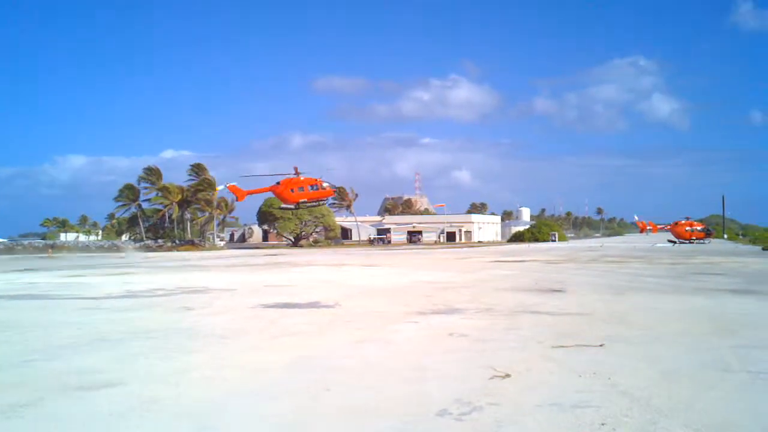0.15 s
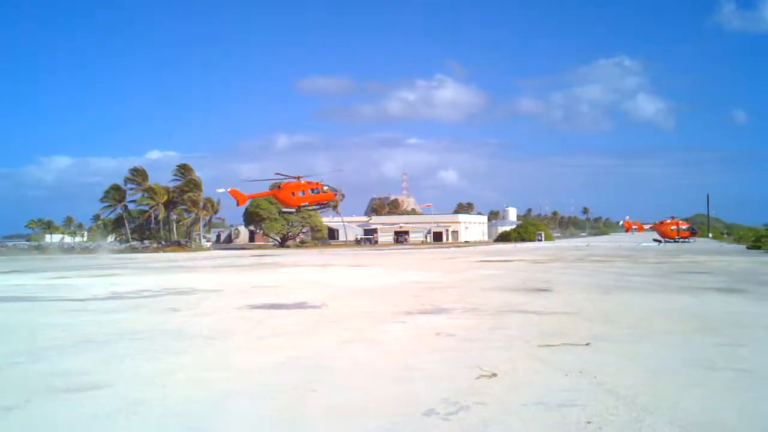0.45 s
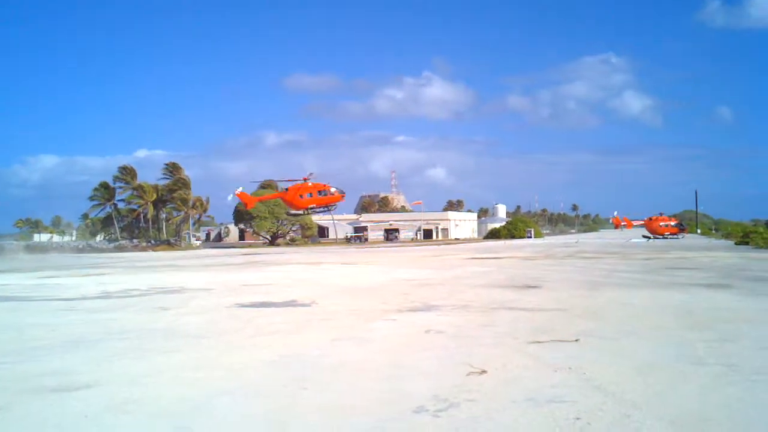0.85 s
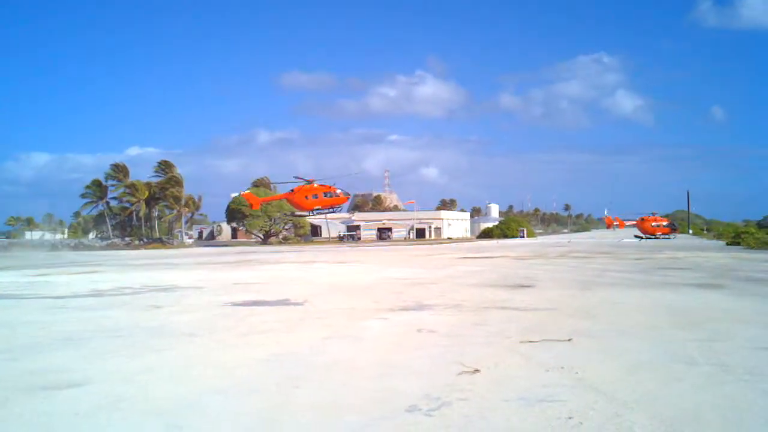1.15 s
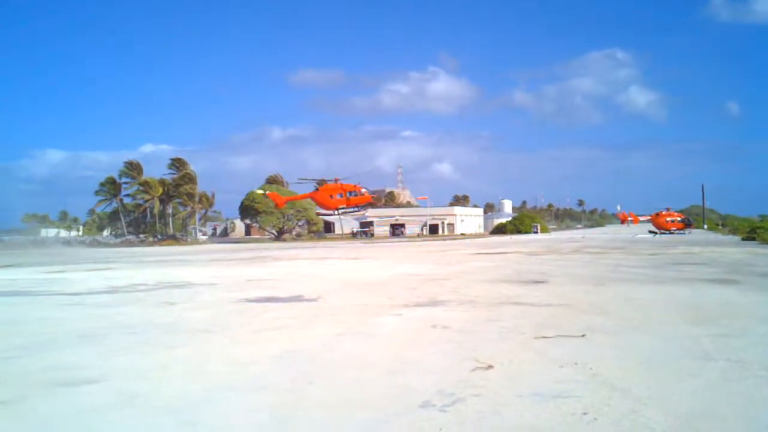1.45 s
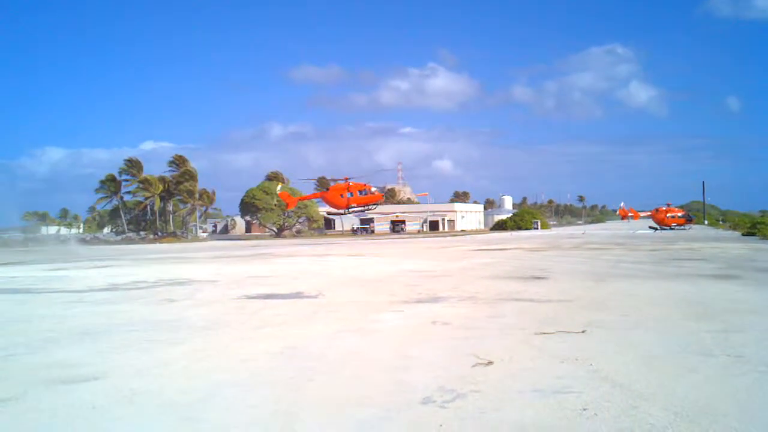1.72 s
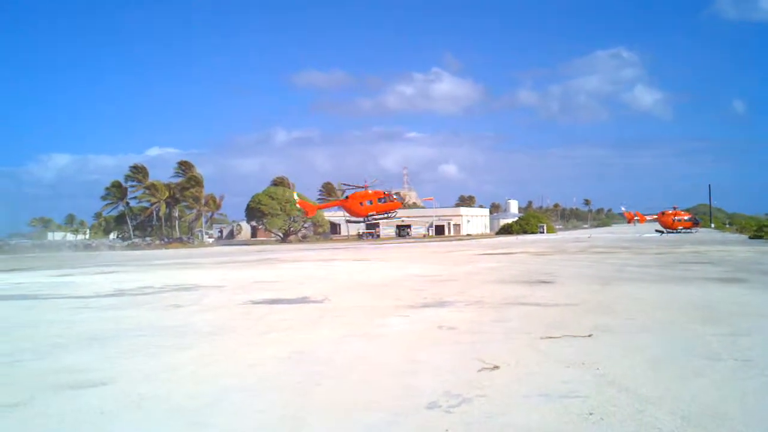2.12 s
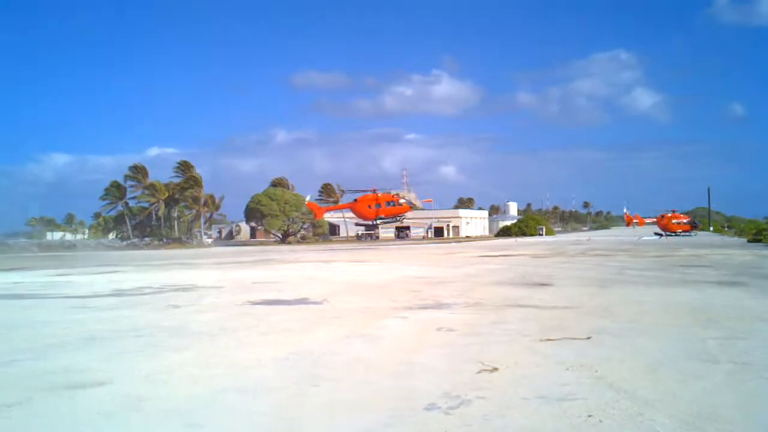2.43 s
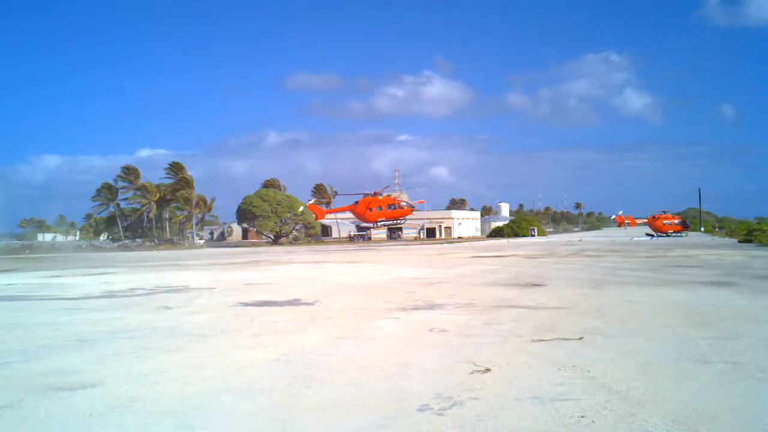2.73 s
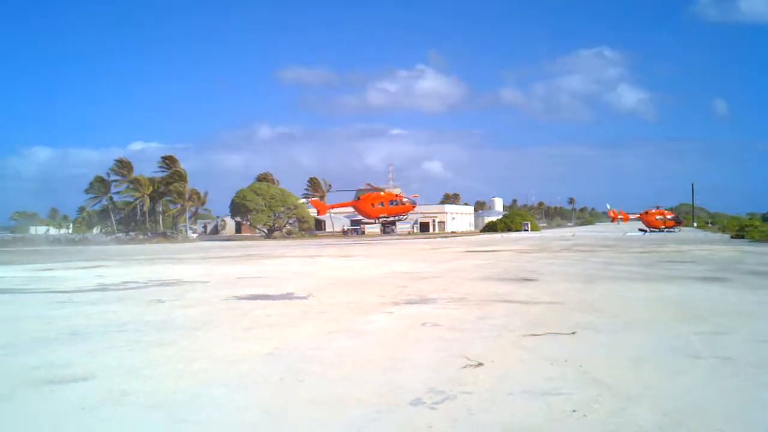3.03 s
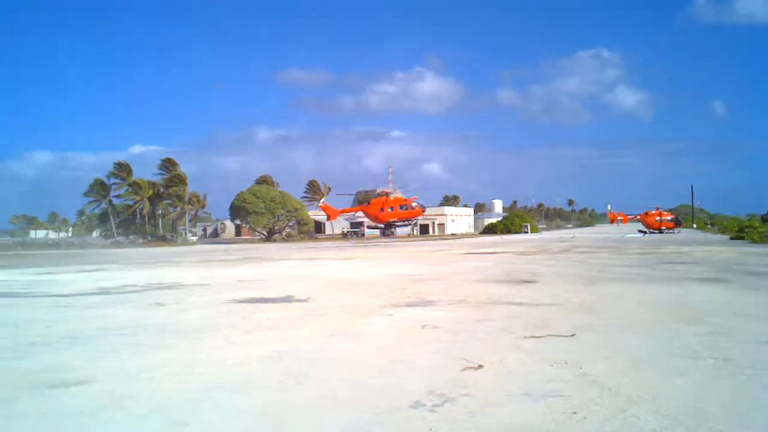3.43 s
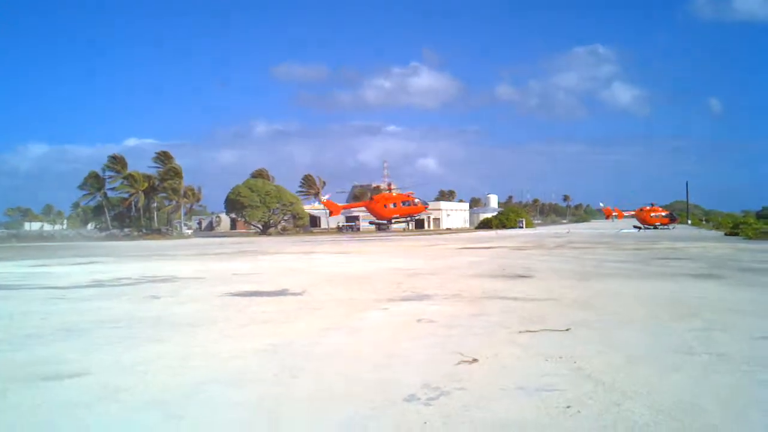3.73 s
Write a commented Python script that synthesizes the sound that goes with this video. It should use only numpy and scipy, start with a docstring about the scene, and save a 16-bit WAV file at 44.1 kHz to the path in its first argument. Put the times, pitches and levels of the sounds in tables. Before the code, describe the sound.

Continuous helicopter drone with rapid blade flutter and thin turbine whine, heard outdoors from some distance; uneven wind buffets strike the close-spaced stereo microphone throughout, while blown sand hisses in brief swells.

```python
"""On a sandy airfield, a helicopter hovers some way off. Gusts buffet the microphone and blow hissing sand.
The tail rotor hums as a set of sine tones, the main blades swish as pulsing noise, the turbines whine.
Wind, buffets and sand are shaped noises that differ at the two closely spaced ports of the microphone.
The recorder widens the stereo image by subtracting from each port the other one, slightly delayed."""
import sys
import numpy as np
from scipy import signal
from scipy.fft import rfft, irfft
from scipy.io import wavfile
from scipy.ndimage import uniform_filter1d

SR = 44100
rng = np.random.default_rng(int(sys.argv[2]) if len(sys.argv) > 2 else 0)


def int16_out(signal):
    """Quantize to a 16-bit WAV file."""
    q = np.round(np.clip(np.atleast_2d(signal).T, -1, 1) * 32767)
    wavfile.write(sys.argv[1], SR, q.astype(np.int16))


N = 170667
TIME = np.arange(N) / SR   # seconds
BINS = np.maximum(np.fft.rfftfreq(N, 1 / SR), 1)   # Hz, kept above zero for the logarithm

# Wind strength at the microphone. Each row: time in seconds, level in dB.
GUST_LEVEL = [(0.0, 1), (0.14, 9), (0.18, -5.5), (0.34, 5), (0.42, 1), (0.5, 6.5), (0.59, -1), (0.67, 2),
              (0.73, 1), (0.77, 9.5), (0.89, -2.5), (1.0, 7.5), (1.17, -6.5), (1.28, 0.5), (1.31, -3),
              (1.37, -0.5), (1.5, -1), (1.72, 1), (1.75, 9), (1.81, -4), (1.88, 4.5), (2.1, 5.5), (2.27, 3),
              (2.32, -0.5), (2.35, 3), (2.41, 3.5), (2.49, 1), (2.58, 0.5), (2.71, 2), (2.83, -2.5),
              (2.89, 1.5), (2.96, -3.5), (3.07, 5), (3.13, -1), (3.17, 4), (3.32, 5.5), (3.43, 5.5),
              (3.51, -3), (3.62, -2), (3.72, 3.5), (3.79, -13), (3.86, 4)]
# Wind rumble in each port when the gust level is 0 dB. Each row: frequency in Hz, density in dB per Hz.
WIND_SPECTRUM = [(25, -67), (45, -74), (65, -61), (100, -53), (150, -49.5), (230, -52), (350, -53.5),
                 (500, -61.5), (750, -66), (1200, -75.5), (1900, -77), (2700, -78), (4000, -101.5),
                 (7000, -105)]
GUST_TOP_SHARE = 0.5   # the highest band follows the gusts by half, the lowest fully
WIND_BILLOW_DB, WIND_BILLOW_HZ = 1.5, 2.9   # slow billowing, strongest in the lowest band
EDDY_HZ = 60.4   # rate of the quick eddies
# Change in dB per unit of eddy strength, in the lowest and the highest band.
EDDY_BASS_DB, EDDY_TREBLE_DB = 0.9, 2.5
SHARED_EDDY, OWN_EDDY = 1.66, 0.71   # eddy strength common to both ports, and separate in each

# Eddies that hit the ports hard. Each row: start in seconds, body level in dB, length in seconds,
# thump level in dB relative to the body, crackle level in dB.
BUFFET_EVENTS = [(.004, -14.5, 0.0064, -3, -36), (0.02, -18, 0.012, 3, -40), (0.036, -11, 0.014, -2, -55),
                 (.077, -18.5, 0.022, -2, -54), (0.103, -14.5, 0.017, -2, -53),
                 (.131, -12, 0.016, 1.5, -54), (0.29, -18, 0.012, 5, -57), (.334, -13, 0.013, 1, -41),
                 (0.494, -21, 0.0073, 0, -55), (.522, -17, .015, 6, -49), (0.633, -15.5, 0.0072, 0, -51),
                 (0.668, -17, 0.012, 3, -57), (0.696, -17, 0.0085, -6, -44), (0.769, -20, 0.016, 4, -45),
                 (0.794, -18, 0.021, 2, -44), (0.972, -15, 0.013, 5.5, -38), (1.013, -13.5, 0.021, 4, -35),
                 (1.044, -9.5, 0.0055, 4, -32), (1.085, -25.5, 0.021, 13, -58),
                 (1.239, -15, 0.014, -9, -59), (1.269, -18, 0.016, 4, -51), (1.649, -12, 0.01, 4, -43),
                 (1.74, -17, 0.015, 7, -53), (1.866, -13, 0.0085, -1, -56), (1.908, -15.5, 0.012, -3, -45),
                 (2.082, -14.5, 0.014, -4, -48), (2.151, -15.5, 0.017, 1, -42),
                 (2.189, -16.5, 0.019, 7, -55), (2.227, -11, 0.0075, 7, -54), (2.258, -12, 0.0093, 10, -30),
                 (2.351, -24, 0.0047, 19, -55), (2.398, -21, 0.0067, -6, -35),
                 (2.478, -17, 0.014, 7.5, -45), (2.52, -25, 0.0083, 8, -50),
                 (2.614, -17.5, 0.032, -15, -40), (2.709, -16, 0.0074, -1, -55),
                 (3.031, -18.5, 0.0065, -4, -46), (3.09, -10.5, 0.0068, -1, -54),
                 (3.383, -25, 0.011, -6, -55), (3.431, -12, 0.012, 6, -60), (3.478, -14, 0.004, 5.5, -59),
                 (3.521, -19.5, 0.023, 5, -54), (3.561, -10, 0.012, -5, -41),
                 (3.579, -11.5, 0.0196, 3, -37.5), (3.64, -8, 0.01, -0.5, -40)]
# Colour of a buffet's body and thump at 0 dB. Each row: frequency in Hz, density in dB per Hz.
BUFFET_SPECTRUM = [(40, -49), (100, -31), (250, -31.5), (500, -34.5), (900, -43.5), (1400, -49),
                   (2000, -58.5), (3000, -84), (4500, -100)]
# Colour of a buffet's crackle at 0 dB. Each row: frequency in Hz, density in dB per Hz.
CRACKLE_SPECTRUM = [(800, -56), (2000, -28.5), (3400, -38), (4500, -52), (8000, -64)]
BUFFET_EDGE_S, BUFFET_FADE_DB, BUFFET_RAGGED_DB = 0.00088, 1.5, 2.5
THUMP_BELOW_HZ = 310   # the thump lies below this pitch, the body above
BODY_EVEN_S, THUMP_EVEN_S = 0.0045, 0.0124   # body and thump are steadied over these times

# Level of the blowing sand. Each row: time in seconds, level in dB.
SAND_LEVEL_CURVE = [(0.0, -47.5), (0.3, -49), (0.45, -45), (0.65, -49.5), (0.73, -39), (0.75, -36.5),
                    (0.81, -42), (0.97, -46), (1.02, -42.5), (1.13, -50), (1.48, -47), (1.69, -37.5),
                    (1.8, -42), (1.87, -39.5), (1.91, -46.5), (1.95, -38.5), (2.17, -45.5), (2.21, -41),
                    (2.34, -50.5), (2.48, -45), (2.55, -50), (2.63, -42.5), (2.84, -52), (2.92, -43),
                    (2.96, -46.5), (3.21, -43.5), (3.39, -50.5), (3.48, -46), (3.55, -52.5), (3.87, -46)]
# Sand hiss at 0 dB. Each row: frequency in Hz, density in dB per Hz.
SAND_SPECTRUM = [(2600, -55), (3050, -46), (4000, -43.5), (4450, -40), (5200, -34), (6400, -36.5),
                 (7500, -35), (8600, -36), (9300, -45.5), (10200, -38.5), (11300, -44), (12600, -51.5),
                 (14000, -51)]
SAND_FLUTTER_DB, SAND_FLUTTER_HZ = 3, 21.2   # random flutter of each band
SAND_GRAIN_DB, SAND_CHOP_DB = 1, 0.33   # fast graininess; swing with each main blade
SAND_SECOND_PORT_DB = 0.44   # the second port gets this much more sand

# Turbine whines. Each entry: pitch in Hz.
WHINE_PITCHES = [3230, 5694, 6284, 8614, 9785, 10380]
# How widely each whine is smeared. Each entry: width in Hz.
WHINE_WIDTHS = [63, 20, 83, 80, 120, 270]
# Level of each whine halfway through the scene. Each entry: level in dB.
WHINE_LEVELS = [-62.5, -65, -60.5, -67, -59, -54.5]
# Steady rise or fall of each whine. Each entry: rise in dB per second.
WHINE_RISES = [-1, 4, 3.5, -7, -1, -1.5]
WHINE_WANDER, WHINE_WAVER_DB = .003, 3.5   # wander as a fraction of the pitch; waver of the level

# Air torn by the main blades at 0 dB. Each row: frequency in Hz, density in dB per Hz.
ROAR_SPECTRUM = [(60, -88), (150, -56), (220, -60), (360, -58.5), (520, -67.5), (820, -65), (1200, -80.5),
                 (1550, -70.5), (2100, -91), (3200, -101.5), (4500, -100), (12000, -104)]
# Level of the roar. Each row: time in seconds, level in dB.
ROAR_LEVEL_CURVE = [(0, -4), (.8, 0.5), (1.3, -3.5), (2.0, 4), (2.6, -2.5), (3.4, 2.5), (3.87, -0.5)]
MAIN_BLADE_HZ, FIRST_BLADE_S = 25.79, 0.00042   # blades passing per second; first pass
SWISH_BASS_DB, SWISH_TREBLE_DB, SWISH_SPLIT_HZ = 2.5, 0.7, 1010   # swing below and above the split
SWISH_UNEVEN = 0.1   # slow random change of the swing, as a fraction
SLAP_DB, SLAP_S = 3.0, 0.0035   # extra edge as a main blade passes, and its decay
TAIL_CHOP_DB, FIRST_TAIL_BLADE_S = 2, 0.014   # flutter of the roar at the tail blade rate

# Pitches of the rotor tones. Each row: multiple of the tail blade rate, added multiple of the main blade rate.
ROTOR_TONE_ORDERS = [(2, 0), (3, 0), (3, 1), (4, 0), (4, 1), (5, 0), (5, 1), (6, 1), (9, 1), (10, 1)]
# Level of each rotor tone where its swell is 0 dB. Each entry: level in dB.
ROTOR_TONE_LEVELS = [-35.5, -30.5, -38, -38, -36, -62, -60, -53, -53, -54]
# Rise and fall of the rotor tones. Each row: time in seconds, harmonics in dB, side tones in dB.
ROTOR_TONE_SWELL = [(0, -15, -13), (.45, -16, -28), (.65, 0, -4), (1.05, -12, -11), (1.45, -2, -30),
                    (1.9, -3, 3), (2.25, 0.5, -4), (2.42, -8, -3), (2.62, 3, 0), (3.0, -1.5, 2),
                    (3.4, -7, 8), (3.65, 2, 2.5), (3.87, -22, -1.5)]
TAIL_BLADE_HZ = 72.8
TONE_WAVER_DB, SPEED_WANDER = 1.14, 0.00046   # wander as a fraction of the rotor speed

# How much of the opposite port is subtracted. Each row: frequency in Hz, share from 0 to 1.
CROSSFEED_SHARE = [(100, 1), (4100, 1), (4700, .4), (14000, .33)]
# Gain of the stereo difference. Each row: frequency in Hz, gain in dB.
WIDTH_GAIN = [(100, -1), (500, 0), (1000, 0.5), (2000, 6.5), (3200, -1), (6000, -1), (12000, 0.5)]
PORT_DELAY_S = .000385
DIP_DB, DIP_WIDTH_HZ = -29, 174   # narrow dip in the sum of the channels, near 2600 Hz
CUTOFF_HZ = 13850


def from_db(db):
    """Turn decibels into gain."""
    return 10 ** (np.asarray(db) / 20)


def in_time(rows):
    """Read a control curve at every sample, with straight lines between its points."""
    return np.interp(TIME, *np.transpose(rows))


def at_hz(points, hz):
    """Read a spectrum on a logarithmic frequency axis, since hearing works by ratios of pitch."""
    f, value = np.transpose(points)
    return np.interp(np.log(hz), np.log(f), value)


def drift(rate):
    """Make a smooth random curve of spread 1 with about this many changes a second."""
    # Computed at every 20th sample; the first 3000 values let the filter settle.
    r = np.exp(-40 * np.pi * rate / SR)
    steps = rng.standard_normal(N // 20 + 3002)
    slow = signal.lfilter([1], [1, -2 * r, r * r], steps)[3000:]
    return np.interp(np.arange(N) / 20, np.arange(len(slow)), slow / slow.std())


def noise_bins(spectrum, channels=2):
    """Give the frequency bins of unrelated noises with the given density."""
    white = rfft(rng.standard_normal((channels, N)))
    return white * from_db(at_hz(spectrum, BINS)) * np.sqrt(SR / 2)


def noise_bands(spectrum, count):
    """Split two-port noise into overlapping bands: (height from low 0 to high 1, band)."""
    centres = np.geomspace(spectrum[0][0], spectrum[-1][0], count)
    bins = noise_bins(spectrum)
    for k, share in enumerate(np.eye(count)):
        window = np.interp(np.log(BINS), np.log(centres), share)
        yield k / (count - 1), irfft(bins * window, N)


def evened(noise, hold_s):
    """Hold a noise near its mean power, so that each burst has its own strength."""
    power = uniform_filter1d(noise ** 2, max(int(hold_s * SR), 1))
    return noise * np.sqrt(power.mean() / (power + .05 * power.mean()))


def wind():
    """Lumpy rumble, different in each port: its bass billows slowly, quick eddies shake its upper bands most."""
    gust_db, eddies, out = in_time(GUST_LEVEL), drift(EDDY_HZ), 0
    for height, band in noise_bands(WIND_SPECTRUM, count=9):
        own_eddies = np.array([drift(EDDY_HZ), drift(EDDY_HZ)])
        strength = SHARED_EDDY * eddies + OWN_EDDY * own_eddies
        eddy_db = (EDDY_BASS_DB + (EDDY_TREBLE_DB - EDDY_BASS_DB) * height) * strength
        billow_db = WIND_BILLOW_DB * (1 - height) * drift(WIND_BILLOW_HZ)
        followed_db = gust_db * (1 + (GUST_TOP_SHARE - 1) * height)
        out = out + band * from_db(billow_db + followed_db + eddy_db)
    return out


def buffets():
    """Ragged bursts of turbulence: each hits suddenly, fades a little and breaks off; some thump, some crackle."""
    body_gain, thump_gain, crackle_gain = 0, 0, 0
    for start, db, length, thump_db, crackle_db in BUFFET_EVENTS:
        nearest_edge = np.minimum(TIME - start, start + length - TIME)
        gate = np.clip(nearest_edge / BUFFET_EDGE_S + .5, 0, 1)
        burst = gate * from_db(-BUFFET_FADE_DB * np.clip((TIME - start) / length, 0, 1))
        body_gain = body_gain + from_db(db) * burst
        thump_gain = thump_gain + from_db(db + thump_db) * burst
        crackle_gain = crackle_gain + from_db(crackle_db) * burst
    low = 1 / (1 + (BINS / THUMP_BELOW_HZ) ** 6)   # share of the power that belongs to the thump
    body = evened(irfft(noise_bins(BUFFET_SPECTRUM) * np.sqrt(1 - low), N), BODY_EVEN_S)
    thump = evened(irfft(noise_bins(BUFFET_SPECTRUM) * np.sqrt(low), N), THUMP_EVEN_S)
    crackle = irfft(noise_bins(CRACKLE_SPECTRUM), N)
    bursts = body * body_gain + thump * thump_gain + crackle * crackle_gain
    return bursts * from_db(BUFFET_RAGGED_DB * drift(310))


def sand():
    """Fine grainy hiss of blown sand, fluttering in the rotor wash, a little unequal at the two ports."""
    hiss = 0
    for _, band in noise_bands(SAND_SPECTRUM, count=14):
        hiss = hiss + band * from_db(SAND_FLUTTER_DB * drift(SAND_FLUTTER_HZ))
    wash_db = SAND_CHOP_DB * np.cos(2 * np.pi * MAIN_BLADE_HZ * (TIME - FIRST_BLADE_S))
    grain_db = SAND_GRAIN_DB * drift(740)
    level = from_db(in_time(SAND_LEVEL_CURVE) + wash_db + grain_db)
    return hiss * level * from_db([[0], [SAND_SECOND_PORT_DB]])


def turbines():
    """Narrow whines, smeared and swayed by the moving air, differently at each port."""
    out = 0
    for hz, width_hz, db, rise in zip(WHINE_PITCHES, WHINE_WIDTHS, WHINE_LEVELS, WHINE_RISES):
        phase = 2 * np.pi * np.cumsum(hz * (1 + WHINE_WANDER * drift(4))) / SR
        # Random strengths of the cosine and the sine spread the tone into a narrow band.
        smeared = np.array([drift(width_hz) * np.cos(phase) + drift(width_hz) * np.sin(phase)
                            for port in range(2)])
        level_db = db + rise * (TIME - TIME.mean()) + WHINE_WAVER_DB * drift(6.8)
        out = out + smeared * from_db(level_db)
    return out


def main_rotor():
    """A roar that swells and slaps with every main blade, mostly in its bass, and flutters with the tail blades."""
    blades = MAIN_BLADE_HZ * (TIME - FIRST_BLADE_S)
    swish = np.cos(2 * np.pi * blades) * (1 + SWISH_UNEVEN * drift(2.3))
    since_blade_s = (blades % 1) / MAIN_BLADE_HZ
    slap = np.exp(-since_blade_s / SLAP_S)
    chop = np.cos(2 * np.pi * TAIL_BLADE_HZ * (TIME - FIRST_TAIL_BLADE_S))
    bins = noise_bins(ROAR_SPECTRUM, channels=1)   # the same roar reaches both ports
    upper = BINS ** 2 / (BINS ** 2 + SWISH_SPLIT_HZ ** 2)
    bass = irfft(bins * (1 - upper), N) * from_db(SWISH_BASS_DB * swish)
    treble = irfft(bins * upper, N) * from_db(SWISH_TREBLE_DB * swish)
    return (bass + treble) * from_db(in_time(ROAR_LEVEL_CURVE) + SLAP_DB * slap + TAIL_CHOP_DB * chop)


def tail_rotor():
    """Harmonics of the tail blades, with side tones where they chop the main rotor's wake."""
    turned = TIME + np.cumsum(SPEED_WANDER * drift(1.43)) / SR   # time bent by the wandering rotor speed
    s, harmonic_db, side_tone_db = np.transpose(ROTOR_TONE_SWELL)
    out = 0
    for (tail, main), db in zip(ROTOR_TONE_ORDERS, ROTOR_TONE_LEVELS):
        cycles = (tail * TAIL_BLADE_HZ + main * MAIN_BLADE_HZ) * turned + rng.random()
        swell_db = np.interp(TIME, s, side_tone_db if main else harmonic_db)
        level = from_db(db + swell_db + TONE_WAVER_DB * drift(2.0))
        out = out + level * np.sin(2 * np.pi * cycles)
    return np.sqrt(2) * out   # levels count as effective (RMS) values


def scene():
    """Add up the pressure at the two microphone ports."""
    return wind() + buffets() + sand() + turbines() + main_rotor() + tail_rotor()


def record(dry):
    """Widen the image by delayed cross-subtraction, clip the highest peaks, cut the top. Apart from this, the
    sum of the channels dips narrowly near 2600 Hz."""
    ports = rfft(dry)
    delay = np.exp(-2j * np.pi * BINS * PORT_DELAY_S)
    left, right = ports - at_hz(CROSSFEED_SHARE, BINS) * delay * ports[::-1]
    dip = from_db(DIP_DB * np.exp(-((BINS - 1 / PORT_DELAY_S) / DIP_WIDTH_HZ) ** 2))
    mid = (left + right) / 2 * dip
    side = (left - right) / 2 * from_db(at_hz(WIDTH_GAIN, BINS))
    clipped = np.clip(irfft(np.array([mid + side, mid - side]), N), -1, 1)
    top_cut = signal.ellip(12, .1, 90, CUTOFF_HZ, fs=SR, output="sos")
    return signal.sosfilt(top_cut, clipped)


dry = scene()
out = record(dry)
int16_out(out)
```